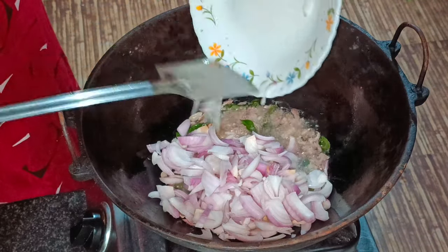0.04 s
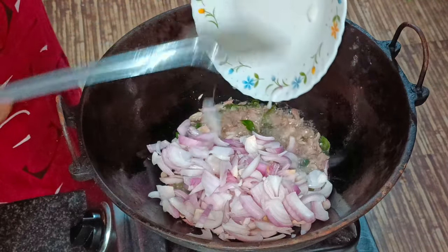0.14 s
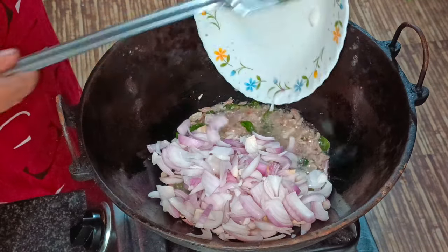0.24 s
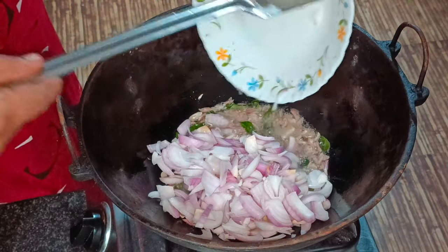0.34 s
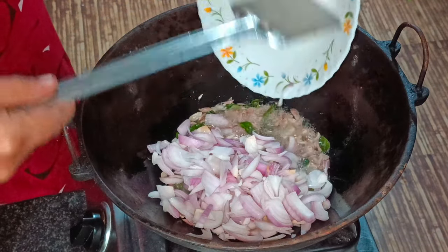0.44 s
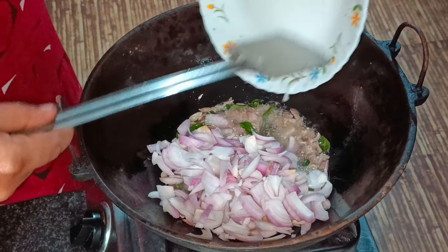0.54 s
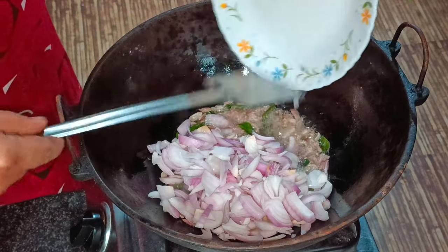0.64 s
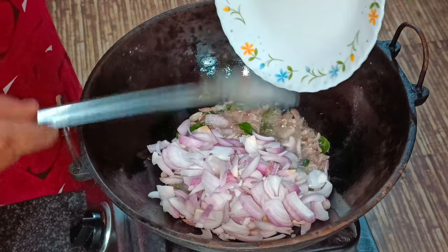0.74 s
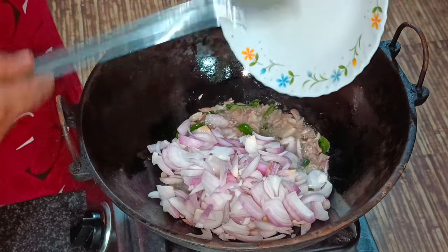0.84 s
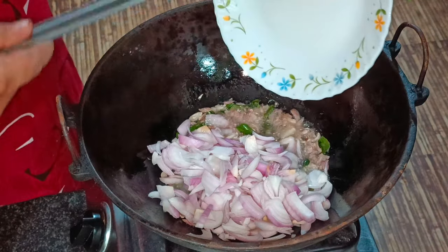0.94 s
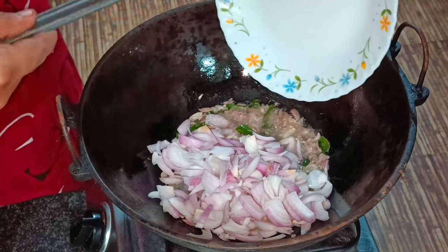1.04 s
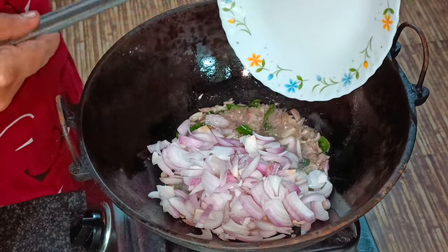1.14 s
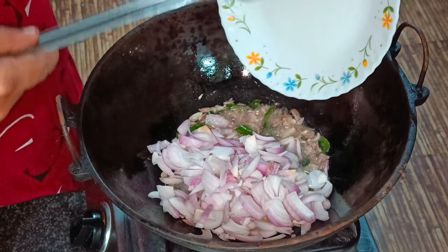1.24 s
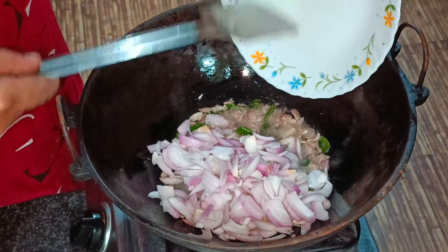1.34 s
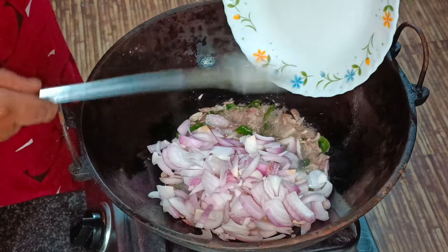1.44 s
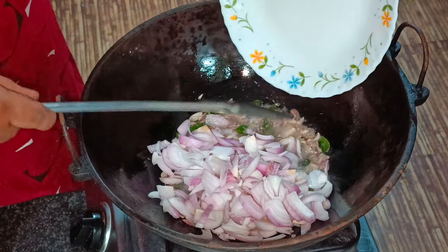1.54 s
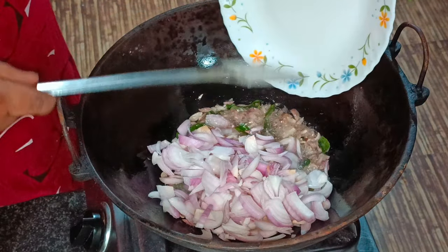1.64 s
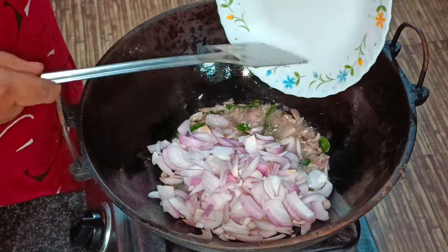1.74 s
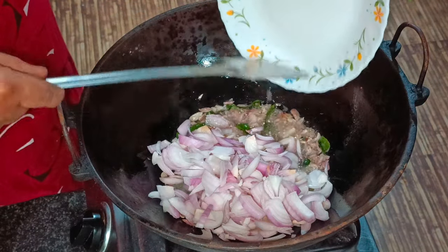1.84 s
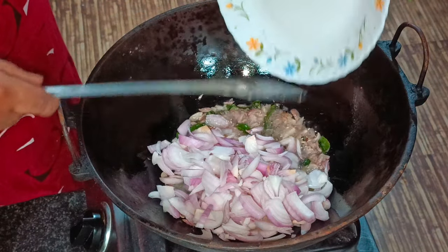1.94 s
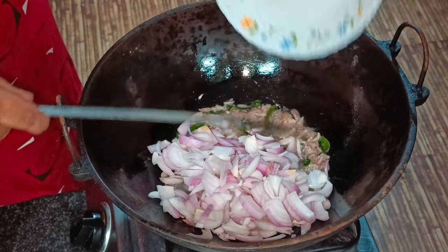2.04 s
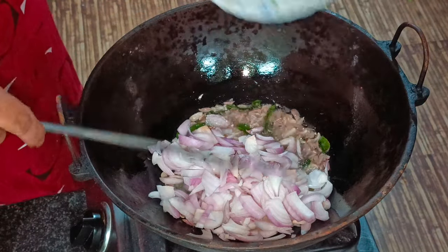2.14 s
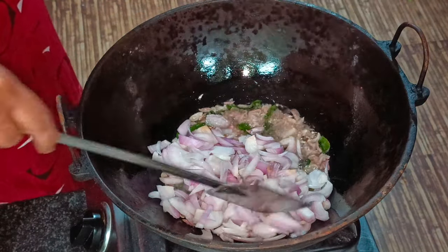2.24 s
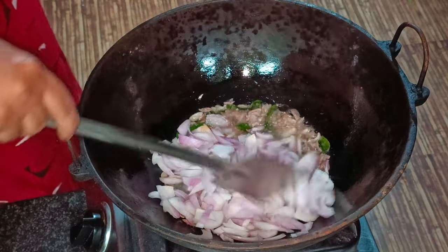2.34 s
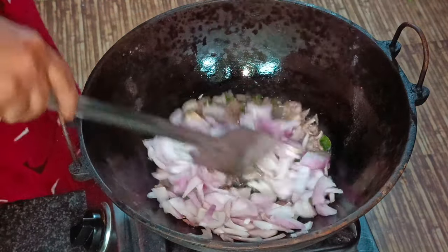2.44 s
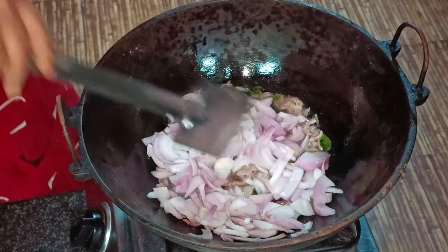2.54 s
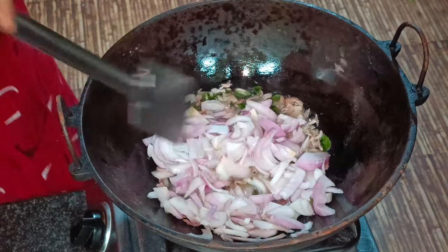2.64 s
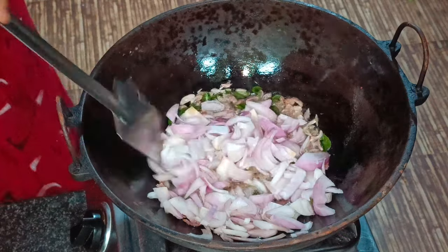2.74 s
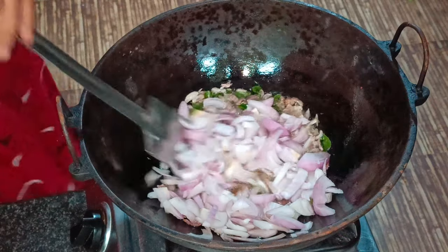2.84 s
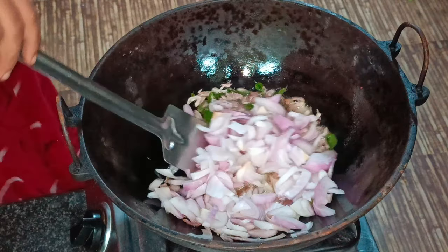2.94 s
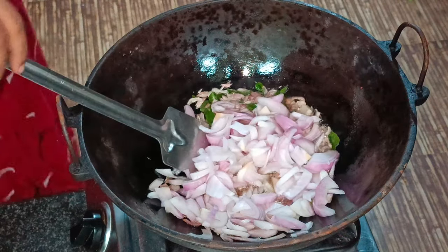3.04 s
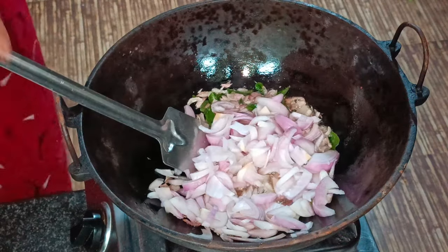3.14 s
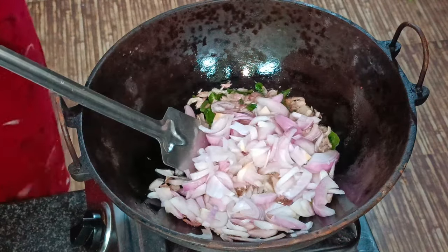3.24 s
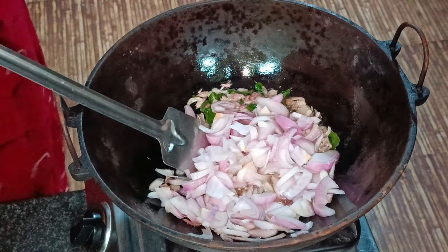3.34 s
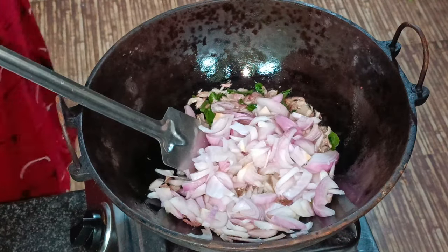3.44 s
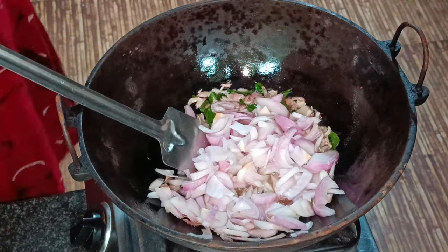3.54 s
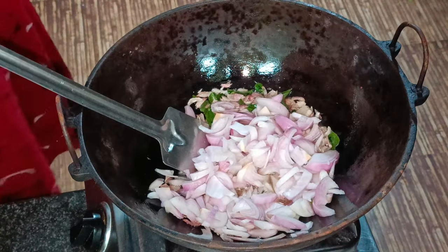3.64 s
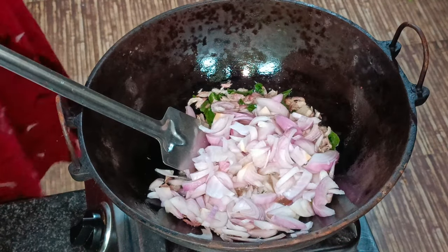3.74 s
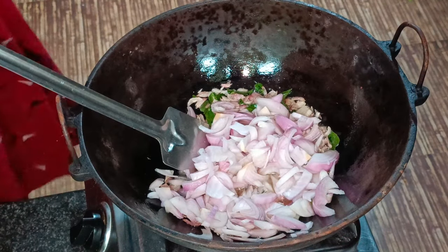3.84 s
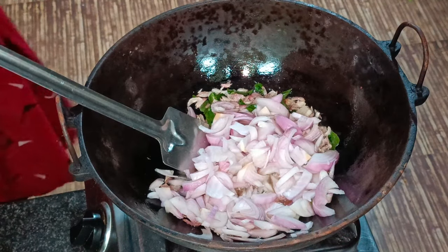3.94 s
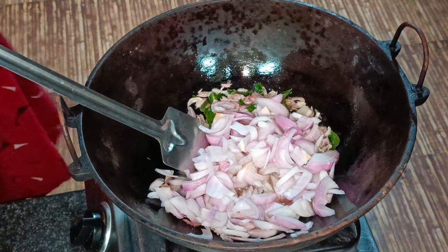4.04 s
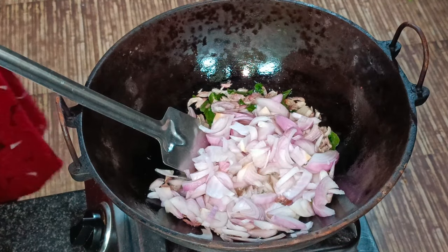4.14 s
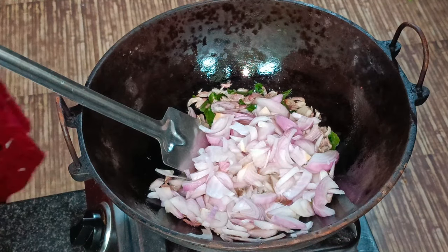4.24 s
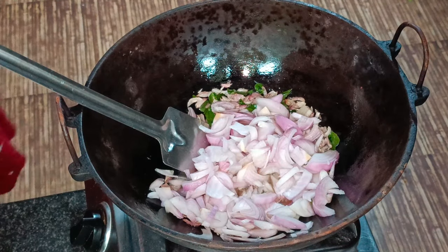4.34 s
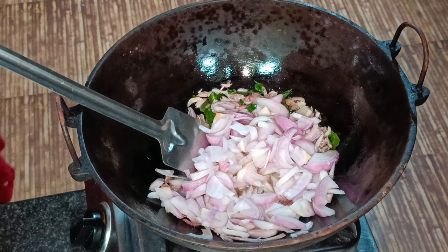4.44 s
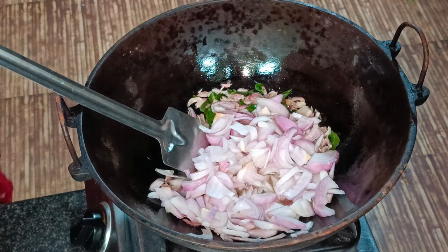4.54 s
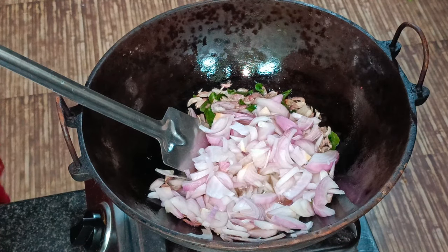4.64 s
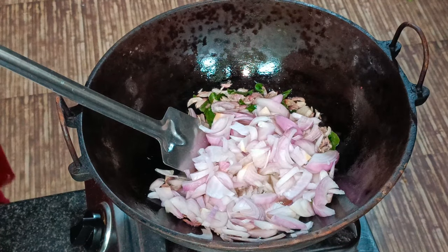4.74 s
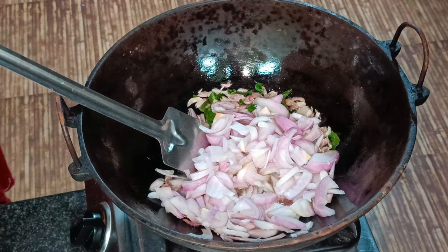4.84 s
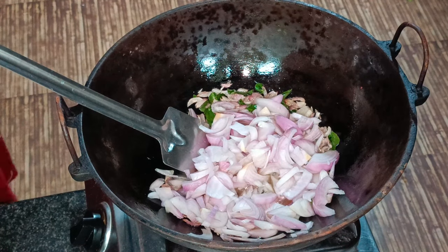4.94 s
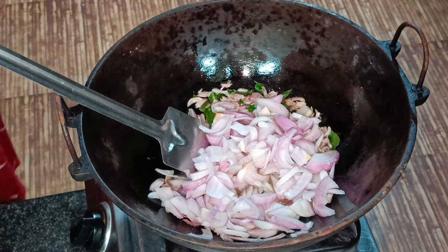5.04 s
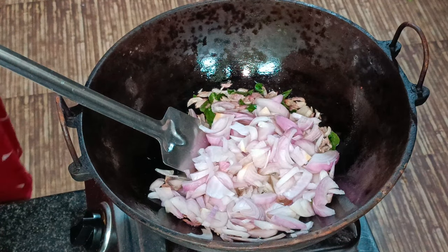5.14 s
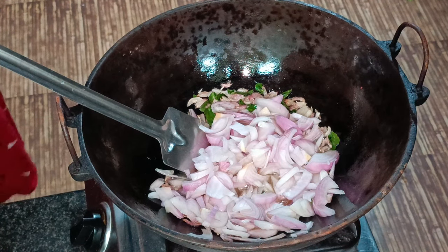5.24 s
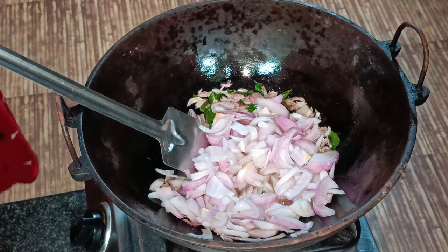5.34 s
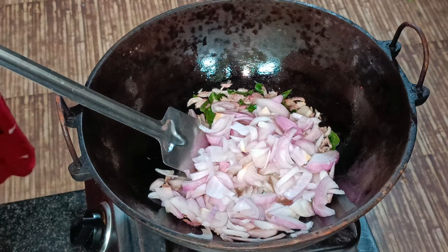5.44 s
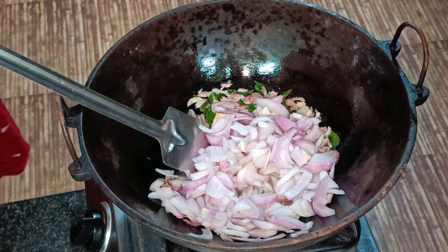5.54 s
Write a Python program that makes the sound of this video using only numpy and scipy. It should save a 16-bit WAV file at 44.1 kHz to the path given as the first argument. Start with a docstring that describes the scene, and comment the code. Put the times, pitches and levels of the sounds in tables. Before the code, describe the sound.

A close stereo pickup above a pan in a small, hard kitchen, with steady low hum and faint smooth sizzle. A light clink of steel on ceramic comes at 0.05 s, then a loud ringing knock at 0.4 with smaller ones to 0.6, running into a gritty, juddering scrape until about 0.75. After a pause with a small pop near 0.9, softer taps at 1.15 and 1.27 mix with a faint scrape, followed by brighter knocks at 1.5, a strong clank at 1.86 and a light one at 1.97. A very soft pan touch comes at 2.2, then metallic, quickly damped knocks on iron at 2.8 and 3.1. Now frying dominates: fine crackle, dry pops, clear at 3.5 and loudest at 3.8, and low hollow bubbles around 4.1 and 4.4, with the simmer generally thickening. At 5.5 the plate lands with a china clink, dull thud and high rim ring.

```python
"""Over a low room hum and faint sizzle, a steel spatula knocks and scrapes onion off a ceramic plate.
It meets an iron pan and is laid on the rim; the onions pop and bubble more as they heat; the plate is set down.
Knocks are noisy clashes plus ringing tones, scrapes are streams of tiny blows, and frying is random little pops.
All is heard close above the pan in a small hard room; the spatula through two microphone ports."""
import sys
import numpy as np
from scipy import signal
from scipy.fft import rfft, irfft, next_fast_len
from scipy.io import wavfile
from scipy.ndimage import map_coordinates

SR = 44100
rng = np.random.default_rng(int(sys.argv[2]) if len(sys.argv) > 2 else 0)


def waveform_to_disk(signal):
    """Save audio, clipped to [-1, 1], as 16-bit WAV at the path in sys.argv[1]."""
    frames = np.transpose(np.atleast_2d(signal))
    scaled = np.clip(frames, -1, 1) * 32767
    samples = np.round(scaled).astype(np.int16)
    wavfile.write(sys.argv[1], SR, samples)


N = 246959  # samples, 5.6 s
T = np.arange(SR) / SR  # seconds since a contact


def amp(db):
    """Turn decibels into a gain."""
    return 10 ** (np.asarray(db) / 20)


def unit(x, size=None):
    """Scale to rms 1, judged on the first size samples."""
    return x / np.sqrt(np.mean(x[..., :size] ** 2) + 1e-20)


def fade(t60, hold=0):
    """Stay level for hold seconds, then fall 60 dB in t60 seconds."""
    return np.exp(-np.log(1000) * np.maximum(T - hold, 0) / t60)


def along(points, hz):
    """Read a curve of (pitch_hz, value) points on a log pitch axis."""
    point_hz, value = np.transpose(points)
    return np.interp(np.log(hz + 1), np.log(point_hz + 1), value)


def colour(x, db_of_hz):
    """Filter with the given gain curve, with no sound ahead of its cause (minimum phase)."""
    size = x.shape[-1]
    m = 2 * next_fast_len(size)
    gain = amp(db_of_hz(np.fft.rfftfreq(m, 1 / SR)))
    cepstrum = irfft(np.log(gain + 1e-6))
    # fold the cepstrum to one side: this makes the filter causal
    cepstrum[1:m // 2] *= 2
    cepstrum[m // 2 + 1:] = 0
    response = np.exp(rfft(cepstrum))
    return irfft(rfft(x, m) * response, m)[..., :size]


def bell(hz, centre, octaves):
    """A bump of height 1 on the log pitch axis."""
    return np.exp(-.5 * (np.log2((hz + 1) / centre) / octaves) ** 2)


def pair(apart, size=SR):
    """Stereo white noise; apart is the side-to-mid ratio."""
    mid, side = rng.standard_normal((2, size))
    return unit(np.array([mid + apart * side, mid - apart * side]))


def add(track, s, sound):
    """Mix a sound in at s seconds."""
    start = max(round(s * SR), 0)
    part = sound[:, :max(N - start, 0)]
    track[:, start:start + part.shape[1]] += part


# How fast the room's answer dies: pitch_hz, decay_s (for a 60 dB fall)
ROOM_DECAY = [(150, 0.082), (700, 0.2), (2500, 0.28), (8000, 0.38), (15000, 0.053)]


def in_room(x, wet_db):
    """A sound plus the kitchen's answer: a noise tail in which each pitch dies at its own speed."""
    hz, t, z = signal.stft(rng.standard_normal((2, SR // 2)), SR, nperseg=256)
    decay = np.exp(-np.log(1000) * t / along(ROOM_DECAY, hz)[:, None])
    tail = signal.istft(z * decay, SR, nperseg=256)[1]
    tail *= 1 - np.exp(-(T[:tail.shape[1]] / 0.0015) ** 2)  # the walls take a moment to answer
    tail /= np.linalg.norm(tail[0])
    return x + amp(wet_db) * signal.fftconvolve(x, tail, axes=1)[:, :x.shape[1]]


# Tone of the room hum and sizzle: pitch_hz, level_db (per Hz, relative)
AIR_TONE = [(15, -53), (25, -30.5), (102, -2.5), (170, -1), (200, 0), (284, -8), (342, 0.5), (425, -9.5),
            (587, -10), (905, -12.5), (1280, -14.5), (1430, -16.5), (2590, -12), (14600, -23), (15800, -18)]
# How alike left and right are: pitch_hz, likeness (1 = identical)
AIR_LIKENESS = [(60, 1), (180, 0.94), (550, 0.91), (1650, 0.089), (4970, 0.17), (15000, 1)]


def kitchen(level_db=-50.5):
    """Low room hum under a smooth faint sizzle, both made of coloured noise."""
    def alike(hz):
        return np.clip(along(AIR_LIKENESS, hz), -.98, .98)

    mid, side = rng.standard_normal((2, N))
    mid = colour(mid, lambda hz: along(AIR_TONE, hz) + 10 * np.log10(1 + alike(hz)))
    side = colour(side, lambda hz: along(AIR_TONE, hz) + 10 * np.log10(1 - alike(hz)))
    return amp(level_db) * unit(np.array([mid + side, mid - side]))


def grains(per_s, spread_db, spectrum):
    """Random little pops of uneven size, coloured, put in the room and scaled to rms 1."""
    sizes = amp(spread_db * np.clip(rng.standard_normal(N), -2, 2))
    happens = rng.random(N) < per_s / SR
    pops = happens * sizes * np.sign(pair(apart=0.45, size=N))
    return unit(in_room(colour(pops, lambda hz: along(spectrum, hz)), wet_db=-3))


# Frying levels, before the trims in frying(): time_s, burble_db, crackle_db
FRYING_LEVELS = [(0, -66.5, -63), (1.7, -63, -53), (2.9, -62, -50), (3.4, -57, -45.5), (3.9, -58.5, -52),
                 (4.5, -55, -50), (5, -51, -47), (5.6, -55, -39)]


def frying(burble_trim_db=3.5, crackle_trim_db=-9.5):
    """Juice burbles low under the onions and the oil crackles finely."""
    times, burble_db, crackle_db = np.transpose(FRYING_LEVELS)
    now = np.arange(N) / SR
    # spectra: pitch_hz, level_db
    burble = grains(per_s=110, spread_db=5, spectrum=[
        (200, -49.5), (420, 0.0), (570, 7.0), (750, -12), (1100, -3.5), (3000, -55.0)])
    crackle = grains(per_s=220, spread_db=1.5, spectrum=[
        (500, -11.5), (1200, -4.0), (2000, -1.0), (3000, -14.0), (4500, -4.0), (12000, -24)])
    burble_gain = amp(np.interp(now, times, burble_db + burble_trim_db))
    crackle_gain = amp(np.interp(now, times, crackle_db + crackle_trim_db))
    return burble_gain * burble + crackle_gain * crackle


def ring(modes, port_turn=0.28, twin=0.62, split=3, pressed_t60=0.054):
    """Struck modes fall fast while still in contact, then ring on, each beating with a weaker twin."""
    out = np.zeros((2, SR))
    for hz, db, t60 in modes:
        phase = rng.uniform(0, 2 * np.pi, 2)
        turn = port_turn * rng.standard_normal((2, 1))  # radians, one per side
        strength = amp(db + 2 * rng.standard_normal((2, 1)))
        twin_hz = hz + split / t60 * rng.standard_normal()
        size = min(SR, int((t60 + .05) * SR))
        t = T[:size]
        wave = np.exp(1j * (2 * np.pi * hz * t + phase[0]))
        wave = wave + twin * np.exp(1j * (2 * np.pi * twin_hz * t + phase[1]))
        decay = np.exp(-np.log(1000) * t / t60) + np.exp(-np.log(1000) * t / pressed_t60)
        out[:, :size] += strength * decay * (wave * np.exp(1j * turn)).real
    swell = 1 - np.exp(-T / .002)
    return unit(out * swell, size=SR // 50)


# Tone of the dense, quickly damped ringing of a contact: pitch_hz, level_db (per Hz, relative)
CLASH_TONE = [(200, -22), (520, -9), (720, -14), (900, -7), (2100, -2), (2850, -3), (3400, 1.5),
              (4650, -5.5), (5200, 3.5), (5750, -4.5), (6400, 8.5), (7300, -4), (8100, 4.5), (9000, -11.5),
              (15500, -17.5)]


def clash(chatter, t60, buzz=0.21):
    """The blade buzzes on the surface for chatter seconds; crowded modes, new each time, die fast."""
    attack = 1 - np.exp(-T / 0.00036)
    force = (fade(t60, chatter) + buzz * fade(0.017, chatter)) * attack
    knots = np.arange(0, SR // 2, 110)
    ripple_db = 3.5 * np.clip(rng.standard_normal(len(knots)), -2, 1.5)
    noise = pair(apart=0.77) * force
    body = colour(noise, lambda hz: along(CLASH_TONE, hz) + np.interp(hz, knots, ripple_db))
    return unit(body, size=SR // 50)


def hardness(hz, body_db, edge_db, sheen_db):
    """Tone of a contact: the flat of the blade brings body and dulls the sheen, its edge brings treble."""
    sheen = sheen_db + 0.46 * edge_db - 0.064 * body_db
    return along([(100, -10.5), (450, body_db - 2.5), (900, body_db), (2000, 1 + 0.1 * body_db),
                  (3600, 1), (7000, sheen), (12000, edge_db)], hz)


def strike(tones, body_db, edge_db, sheen_db, favoured_hz, chatter, t60):
    """One blow: a clash plus ringing modes; the point of contact favours one resonance."""
    def tone(hz):
        return hardness(hz, body_db, edge_db, sheen_db) + 9 * bell(hz, favoured_hz, octaves=0.061)

    blow = colour(clash(chatter, t60) + tones, tone)
    return in_room(unit(blow, size=SR // 50), wet_db=-13.5)


# Ringing tones of the ceramic plate: pitch_hz, level_db, decay_s (60 dB fall before any damping)
PLATE_MODES = list(zip( [862, 1100, 1443, 1775, 1936, 1982, 2030, 2222, 3313, 3402, 3555, 3992, 4410, 5240, 5345, 6297, 6650, 6900, 7865, 7998, 12200],
               [-14, -6.5, -19, -13, -2.5, -10.5, -10.5, -4.5, -3, -11, -30, -12, -31, -29, -1.5, -4, -28, -16, -1, -8, -17],
               [0.15, 0.064, 0.28, 0.22, 0.18, 0.35, 0.076, 0.15, 0.38, 0.55, 0.34, 0.12, 0.065, 0.27, 0.18, 0.32, 0.22, 0.35, 0.21, 0.2, 0.12]))
# Ringing tones of the steel spatula: pitch_hz, level_db, decay_s (60 dB fall before any damping)
STEEL_MODES = list(zip( [1421, 1434, 2645, 2880, 3336, 3760, 4250, 5045, 5390, 5755, 5905, 6412, 6912, 7725, 8199, 8330, 9640, 10220, 11500, 13558],
               [-12, -4, -3, -55, -11, -6.5, -1.5, -3, 4, -4, 0.5, 3.5, -6, -6, 3.5, -3, -11.5, -7, -16, -14.5],
               [1.77, 0.39, 0.091, 0.165, 0.4, 0.17, 0.12, 0.075, 0.17, .2, 0.12, 0.11, 0.33, 0.33, 0.15, 0.1, 0.12, 0.15, 0.23, 0.33]))
# Knocks on the plate: start_s, level_db, body_db, edge_db, favoured_hz,
# plate_ring_db (before a trim in blows()), steel_ring_db
PLATE_KNOCKS = [ (0.0543, -27, 8, 4.5, 3340, 0.5, -17), (0.394, -12, 8, -3, 2000, 2.5, -4),
                (.428, -24, 9.5, -5, 2060, -6, -2.5), (0.5554, -23.5, -0.5, 2.5, 3180, 0.5, -8),
                (.595, -22.5, -13, 1, 3210, 6, -18), (1.16, -28, 6.5, -7.5, 990, 2.5, -24),
                (1.269, -30, 2, -12, 1530, 10, -15), (1.489, -24, -8.5, 6, 2280, -6, -11),
                (1.5231, -18.5, -10.5, 0, 3160, -2.5, 0.5), (1.8648, -14.5, 4, 3.5, 1940, 1, -3.5),
                (1.9697, -27, -2.5, 5.5, 3260, 0, -2)]
# Spatula meets iron pan: start_s, level_db, body_db, edge_db, favoured_hz, steel_ring_db
PAN_KNOCKS = [(2.2263, -42.5, 20, -8, 1400, -10), (2.809, -22.5, -13.5, 12.5, 1414, 9.5),
              (3.102, -21, -4.5, -4, 1800, -11.5)]


def blows(usual_db=-21, held_t60=1.2, rebound=0.72, pan_t60=0.29):
    """A harder blow rebounds clear of the plate and rings longer; pan and onions damp the steel quickly."""
    out = np.zeros((2, N))
    for s, db, body_db, edge_db, favoured_hz, plate_db, steel_db in PLATE_KNOCKS:
        ring_t60 = held_t60 * amp(rebound * (db - usual_db))
        tones = amp(plate_db - 4.5) * ring(PLATE_MODES) + amp(steel_db) * ring(STEEL_MODES)
        blow = strike(tones * fade(ring_t60), body_db, edge_db, sheen_db=-6.5,
                      favoured_hz=favoured_hz, chatter=0.0034, t60=.14)
        add(out, s, amp(db) * blow)
    for s, db, body_db, edge_db, favoured_hz, steel_db in PAN_KNOCKS:
        tones = amp(steel_db) * ring(STEEL_MODES) * fade(pan_t60)
        blow = strike(tones, body_db, edge_db, sheen_db=-7,
                      favoured_hz=favoured_hz, chatter=0.0056, t60=0.13)
        add(out, s, amp(db) * blow)
    return out


def tick(centre_hz, octaves_above=0.55, octaves_below=0.66, depth_db=36, pan_spread_db=1.5):
    """A dry little pop somewhere in the pan: a noise snap with one broad resonance, almost nothing above."""
    def tone(hz):
        width = np.where(hz > centre_hz, octaves_above, octaves_below)
        return depth_db * bell(hz, centre_hz, width)

    snap = pair(apart=0.76, size=SR // 6) * fade(0.057)[:SR // 6]
    panning = amp(pan_spread_db * rng.standard_normal() * np.array([[1], [-1]]))
    return unit(colour(snap, tone), size=SR // 150) * panning


# The clearest pops and ticks: start_s, level_db (before a trim in ticks()), pitch_hz
CLEAR_POPS = [(0.8908, -34.5, 2200), (2.2933, -39, 6850), (2.9258, -29.5, 1140), (3.3435, -38, 4570),
              (3.4776, -23, 1470), (3.6728, -36, 1830), (3.7663, -31.5, 2200), (3.8042, -17.5, 2160),
              (3.9484, -28.5, 1430), (4.4583, -32.5, 1050), (4.594, -37, 5800), (4.7012, -32, 1690),
              (4.9304, -29.5, 2320), (4.9667, -31, 1840), (5.038, -34, 1820)]
# Usual level of small pops, mostly growing as the onions heat: time_s, level_db (before a trim)
SMALL_POP_LEVELS = [(0, -51.5), (2.5, -47), (3.3, -41.5), (4.3, -46), (5.6, -36.5)]


def ticks(count=64, usual_hz=2500, spread_octaves=0.75, spread_db=3):
    """A few clear pops stand out of a scatter of small ones of many pitches."""
    out = np.zeros((2, N))
    for s, db, centre_hz in CLEAR_POPS:
        add(out, s, amp(db - 6.0) * tick(centre_hz))
    times = (np.arange(count) + rng.random(count)) / count * N / SR
    chances = np.clip(rng.standard_normal((count, 2)), -2, 2)
    for s, (pitch, strength) in zip(times, chances):
        db = np.interp(s, *np.transpose(SMALL_POP_LEVELS)) + spread_db * strength
        add(out, s, amp(db - 5.0) * tick(usual_hz * 2 ** (spread_octaves * pitch)))
    return in_room(out, wet_db=-12.0)


def loaded(modes):
    """Where the blade presses, the modes shift a little and take new strengths."""
    shift = [.03, 4] * rng.standard_normal((len(modes), 2))  # share of the pitch, dB
    return [(hz * (1 + detune), db + change_db, t60)
            for (hz, db, t60), (detune, change_db) in zip(modes, shift)]


def scrape_tone(hz, body_db, edge_db):
    """Dragged flat, the blade growls in the low mids; tipped on its edge, it hisses."""
    sheen = 0.42 * edge_db - 0.26 * body_db - 2.0
    return along([(100, -20), (900, body_db - 0.5), (1700, body_db + 8), (3600, -1),
                  (7000, sheen), (12000, edge_db + 16.5)], hz)


# Three scrapes over the plate, each a list of: time_s, level_db, body_db, edge_db
SCRAPE_STROKES = [
    [(0.6, -22.5, -9, -16), (0.628, -28.5, -10, -21), (0.684, -29, -3, -5), (0.696, -20, -13, -7),
     (0.71, -30, -7, -9), (0.728, -19, -11, -10), (0.745, -26, -12, -8)],
    [(1.23, -49, -3, -22), (1.244, -26, 0, -29), (1.264, -33.5, 1, -13), (1.27, -28.5, 6, -25),
     (1.306, -34.5, 1.5, -6), (1.346, -49, -5, -9), (1.368, -45.5, -16, 1), (1.39, -47, -16, -4)],
    [(1.43, -53, -11, 6), (1.472, -34, -18, -7), (1.486, -30.5, -9, -8)],
]


def scrapes(build_up_s=.004, judder_db=4.0, tones_db=1.5, spot_s=.02):
    """The blade's edge judders over the glaze, every slip a tiny blow; each spot rings a bit differently."""
    out = np.zeros((2, N))
    slips_per_s, judders_per_s = 1500, 130
    t = T[:round(2 * spot_s * SR)]  # neighbouring spots overlap by half
    for stroke in SCRAPE_STROKES:
        times, level, body, edge = np.transpose(stroke)
        for s in times[0] + spot_s * np.arange(-1, 8):
            now = s + t + build_up_s
            pressure = amp(np.interp(now, times, level, left=-120, right=-120))
            pressure = pressure * np.sin(np.pi * t / t[-1])
            judder = amp(judder_db * map_coordinates(rng.standard_normal(size=8), [t * judders_per_s]))
            happens = rng.random(len(t)) < slips_per_s / SR
            slips = unit(judder * happens * rng.standard_normal(len(t))) * pressure
            tones = ring(loaded(PLATE_MODES)) + amp(-6) * ring(loaded(STEEL_MODES))
            spot = clash(chatter=0, t60=.055) + amp(tones_db) * tones * fade(0.19)
            flat, sharp = np.interp(now, times, body).mean(), np.interp(now, times, edge).mean()
            spot = colour(spot[:, :SR // 4], lambda hz: scrape_tone(hz, flat, sharp))
            spot = unit(spot) / np.sqrt(spot.shape[1])
            add(out, s, signal.fftconvolve(slips[None], spot, axes=1))
    return in_room(out, wet_db=-12)


# The largest bubbles of juice: start_s, level_db (before a trim in bumps())
BUBBLES = [(2.163, -42), (4.056, -35), (4.093, -37), (4.125, -37), (4.377, -38), (4.402, -31.5),
           (4.769, -38)]


def bumps(usual_hz=554.6, pitch_spread=0.067):
    """Bubbles burst under the onions: dull hollow bumps, short fading sines all near one pitch."""
    out = np.zeros((2, N))
    for s, db in BUBBLES:
        hz = usual_hz * (1 + pitch_spread * rng.standard_normal())
        attack = 1 - np.exp(-T / 0.00063)
        bump = np.sin(2 * np.pi * hz * T) * fade(0.064) * attack
        both_sides = unit(np.array([bump, bump])[:, :SR // 3], size=SR // 100)
        add(out, s, in_room(amp(db - 4.0) * both_sides, wet_db=-4.5))
    return out


# Tone of the counter's thud: pitch_hz, level_db (per Hz, relative)
THUD_TONE = [(30, -26), (80, -13), (125, 10.5), (190, -12), (300, 0.5), (600, -8), (900, 1.5), (1800, -13),
             (3000, -27)]


def counter(set_down_s=5.5046, clink_db=-21, thud_db=-31, rim_db=-25, rim_hz=3992):
    """The plate clinks and thuds on the counter; landing flat brings out one high mode of its rim."""
    out = np.zeros((2, N))
    clink = strike(amp(-6.5) * ring(PLATE_MODES), body_db=14, edge_db=-24.5, sheen_db=11.5,
                   favoured_hz=6870, chatter=.0076, t60=0.15)
    thud = colour(pair(apart=.3) * fade(0.26, hold=0.042), lambda hz: along(THUD_TONE, hz))
    rim = colour(ring(PLATE_MODES), lambda hz: 28 * bell(hz, rim_hz, octaves=.06))
    landing = amp(clink_db) * clink
    landing = landing + amp(thud_db) * unit(thud, size=SR // 20)
    landing = landing + amp(rim_db) * unit(rim, size=SR // 50)
    add(out, set_down_s, landing)
    return out


# How far the left port leads the right: pitch_hz, lead_radians
PORT_LEAD = [(100, -4.5), (800, 0.05), (1500, 1.3), (2000, 0.65), (3300, 1.17), (4200, 3), (5500, 2),
             (7000, 0.7), (9000, 0), (15000, -0.5)]
# How much louder the left port is than the right: pitch_hz, difference_db
PORT_BALANCE = [(200, -8), (700, 0.5), (1300, 5.5), (2000, -0.5), (3300, 0), (5300, -3.5), (7000, -1),
                (9000, 8.5), (15000, -4)]


def at_ports(x):
    """Two microphone ports hear the spatula with a small difference of phase and colour."""
    m = next_fast_len(N + SR // 2)
    hz = np.fft.rfftfreq(m, 1 / SR)
    half = np.array([[.5], [-.5]])  # half the difference goes to each side
    gain = amp(half * along(PORT_BALANCE, hz))
    gain /= np.sqrt(np.mean(gain ** 2, axis=0))
    turn = np.exp(1j * half * along(PORT_LEAD, hz))
    return irfft(rfft(x, m) * gain * turn, m)[:, :N]


def scene():
    """Spatula work over the pan, with the onions and the kitchen around it."""
    spatula = at_ports(blows() + scrapes())
    onions = ticks() + bumps() + frying()
    return spatula + onions + counter() + kitchen()


def record(dry, top_hz=15900):
    """The microphone keeps nothing above its band limit."""
    m = next_fast_len(N + SR // 2)
    kept = np.fft.rfftfreq(m, 1 / SR) < top_hz
    return irfft(rfft(dry, m) * kept, m)[:, :N]


dry = scene()
out = record(dry)
waveform_to_disk(out)
```